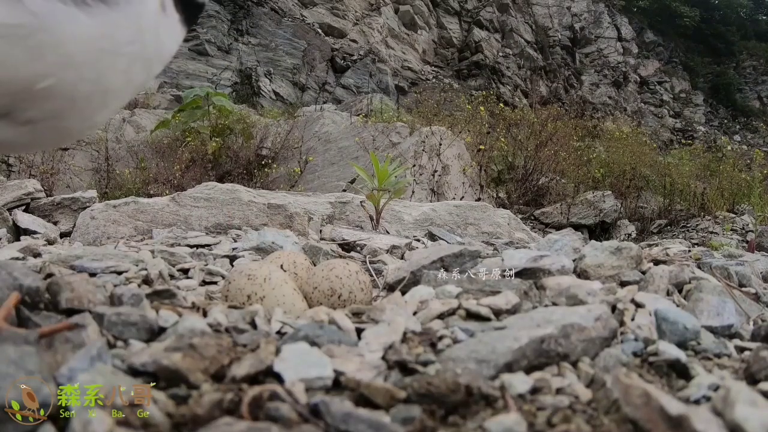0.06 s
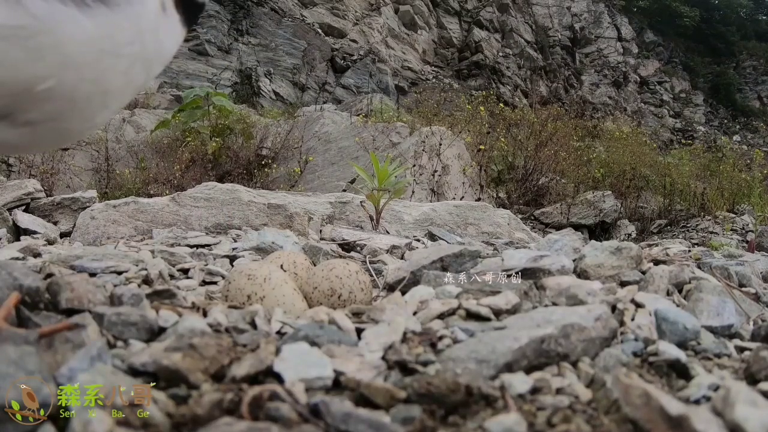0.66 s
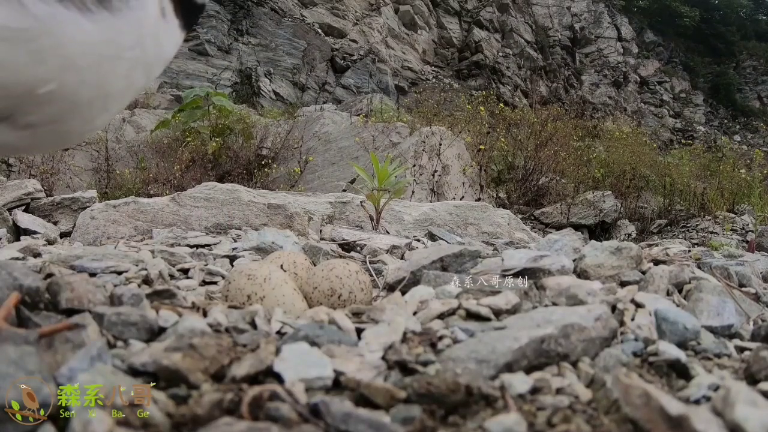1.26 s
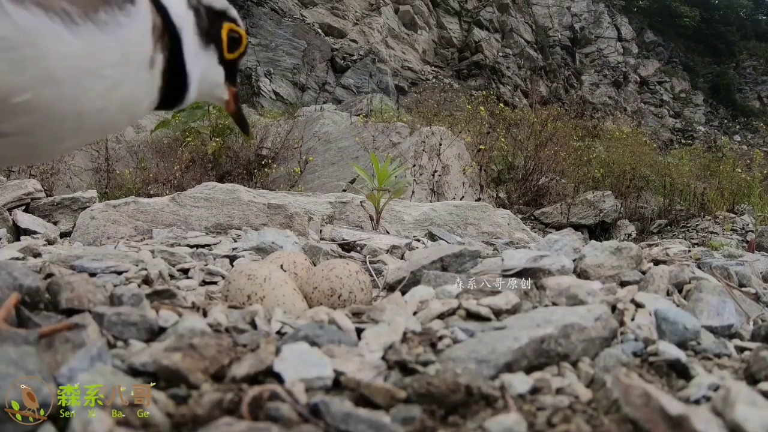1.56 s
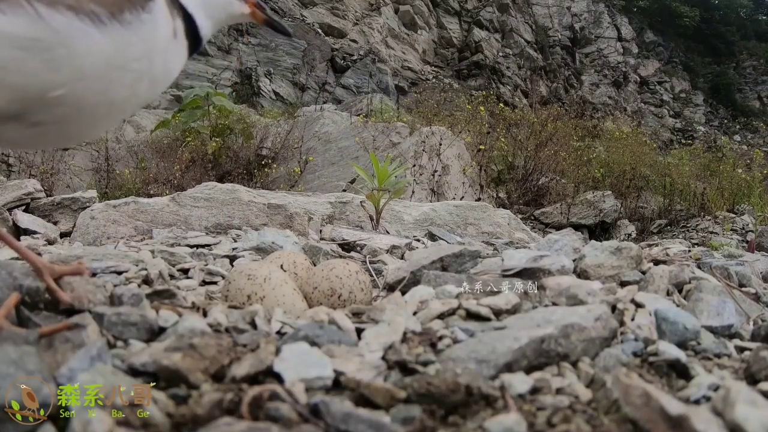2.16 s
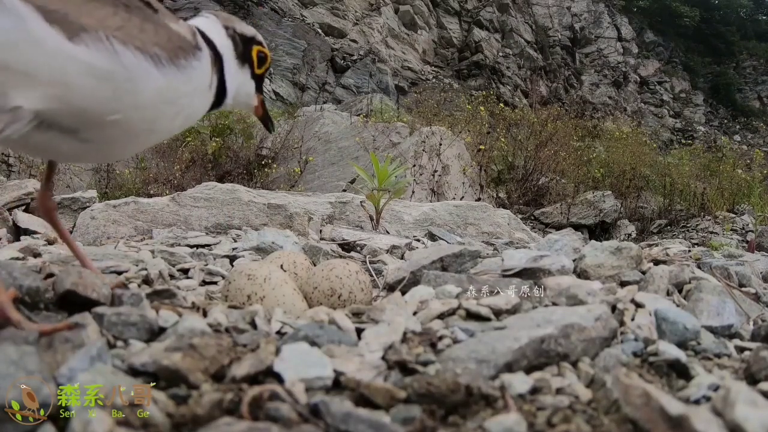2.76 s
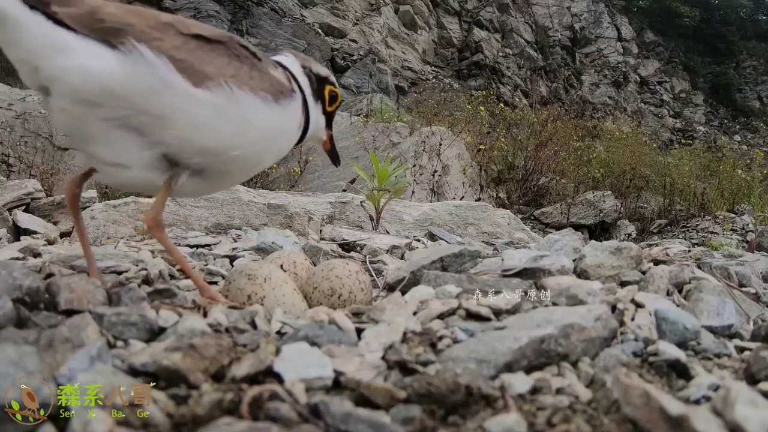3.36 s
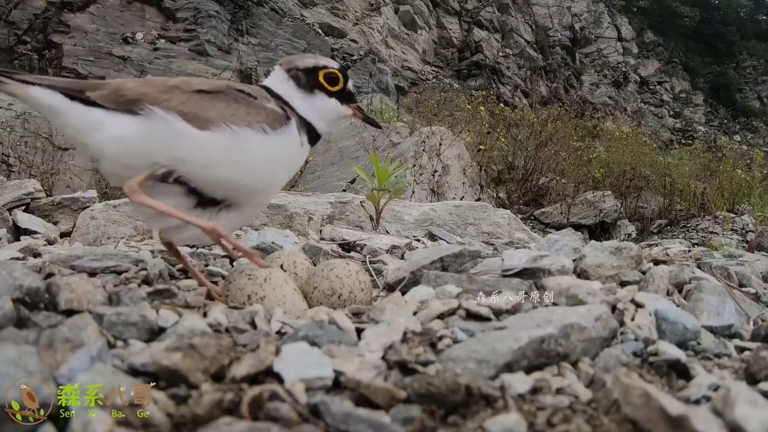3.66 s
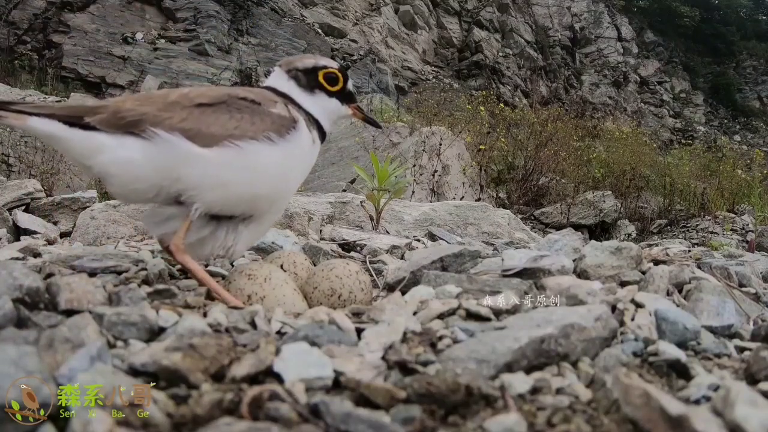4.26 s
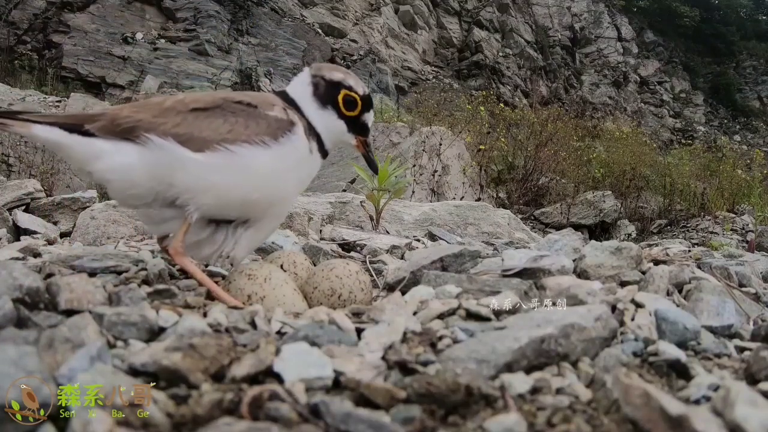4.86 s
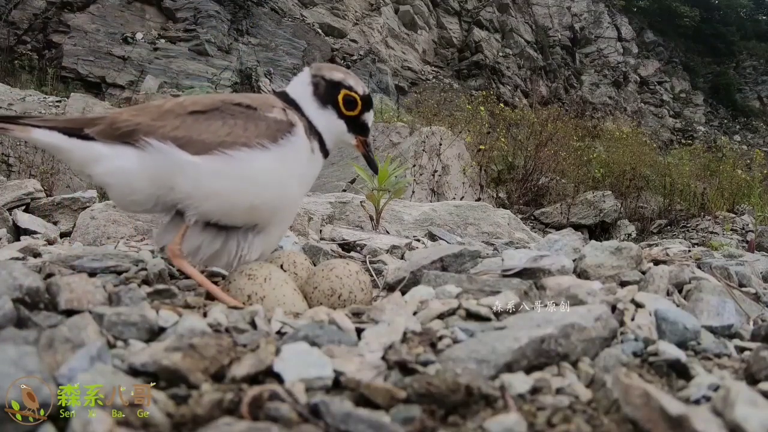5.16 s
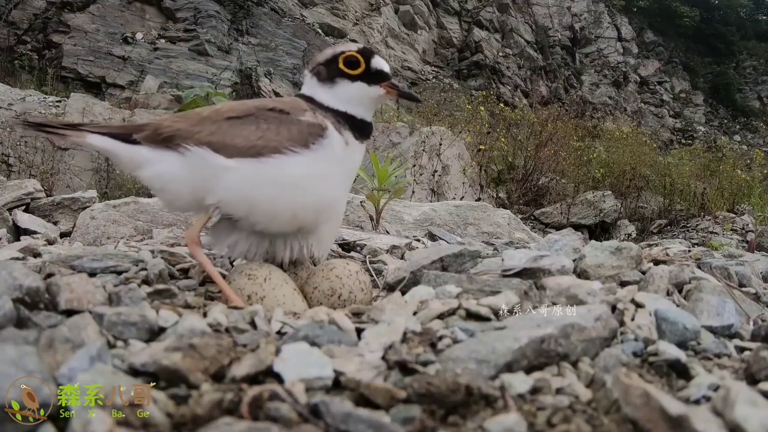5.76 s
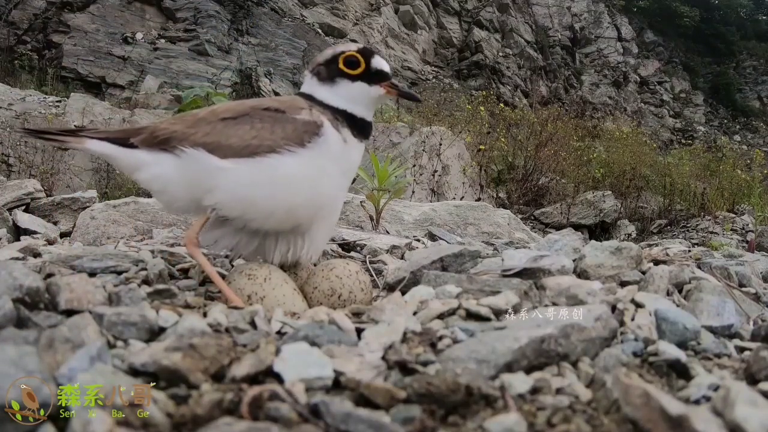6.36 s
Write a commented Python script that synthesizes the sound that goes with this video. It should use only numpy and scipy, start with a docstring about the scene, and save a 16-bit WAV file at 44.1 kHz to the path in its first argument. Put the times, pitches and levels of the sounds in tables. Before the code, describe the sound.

In a rocky river gorge, a steady close trickle bubbles, drips and spatters over stones throughout. A faint river wash and a distant low hum sit underneath, with a few soft bumps. In the second half a small shore bird, some way from the microphone, whistles a quick run of short, slightly hoarse notes mixed with two high peeps, and calls once more, faintly.

```python
"""In a river gorge, water trickles over stones close by: bubbles ring, droplets tick, fine spray fizzes.
Each plink is a pinched-off air pocket ringing with a gliding pitch; each tick is a drop hitting stone.
Further off, a shore bird whistles a few times, its notes smeared by the rock faces, with two thin peeps.
The bed is the even rush of the river, a low, far drone with a beating hum, and soft rumble and bumps."""
import sys
import numpy as np
from scipy import signal
from scipy.fft import rfft, irfft, next_fast_len
from scipy.io import wavfile
from scipy.ndimage import uniform_filter1d

SR = 44100
rng = np.random.default_rng(int(sys.argv[2]) if len(sys.argv) > 2 else 0)


def to_wav(s):
    """Save 16-bit WAV."""
    ch = np.atleast_2d(s).T  # columns
    pcm = np.round(np.clip(ch, -1, 1) * 32767)  # PCM
    wavfile.write(sys.argv[1], SR, pcm.astype(np.int16))


N = 291501
TIME = np.arange(N) / SR

# Levels in the cue tables are relative: each layer adds its own trim.
# hero bubbles: t/s, f/Hz, level/dB, ring time/(usual for that size), glide/(octaves per s)
HERO_BUBBLES = [(.0028, 1067, -41, 1.1, -10), (0.024, 1440, -48.5, 1.6, -6), (0.0656, 2980, -33, 0.18, -24),
                (0.0805, 1278, -32.5, 0.54, 0), (.114, 3290, -41.5, 1.1, -10),
                (.1168, 732, -48.5, 1.1, 1.5), (.145, 3450, -39, 0.9, -23), (0.2447, 4400, -36, 0.57, -27),
                (0.2509, 1386, -34, 0.69, -3), (0.271, 1740, -37.5, 0.75, 5),
                (0.296, 2730, -42.5, 0.73, -6), (0.3496, 3970, -36.5, 1.6, -38), (0.3832, 3260, -49, 2, -3),
                (0.539, 2820, -34.5, 0.49, -28), (.545, 1066, -54.5, 1, 6), (0.598, 2500, -43.5, 0.95, 11),
                (.64, 660, -55.5, 1.1, 3.5), (0.6707, 3800, -36, 0.72, -10),
                (0.7537, 1015, -31, 0.63, 15.5), (0.7741, 1188, -37.5, 1.1, 9.5),
                (.7752, 4330, -39, 1, -13), (0.793, 1560, -28.5, 0.2, -7), (.7947, 2540, -33, 0.38, -34),
                (.8015, 4240, -38.5, .9, -12), (.8724, 2900, -48, 1.2, -12), (.916, 2100, -44, 1.3, 8.5),
                (.955, 1500, -55, 1.2, -7), (1.0829, 1427, -28, 0.55, -5), (1.1021, 4570, -37, 0.67, -30),
                (1.131, 1292, -36.5, 0.95, -2), (1.1557, 1890, -38, 0.88, 31),
                (1.1743, 2920, -29.5, 0.19, -30), (1.199, 1577, -35, 0.67, 5),
                (1.2414, 4900, -43, 2.1, -35), (1.245, 638, -58, 0.97, -3.5), (1.397, 1755, -40, 0.79, -17),
                (1.4022, 2330, -32.5, 0.34, -22), (1.4394, 3980, -42.5, 1.3, -9),
                (1.4473, 1855, -40, 1.1, 8), (1.463, 2800, -36, 0.44, 3), (1.522, 1231, -41.5, 1.36, -7),
                (1.5831, 3430, -33.5, 0.49, -36), (1.583, 1280, -38, 1.2, -0.5),
                (1.5835, 1690, -46, .9, -2), (1.609, 1416, -28, 0.71, 13), (1.6228, 1880, -33, 0.9, -14),
                (1.6633, 3600, -31, 0.6, -20), (1.7012, 2430, -40, 0.47, -12), (1.716, 2390, -45, 1.5, 13),
                (1.721, 900, -48.5, 1.9, 16.5), (1.7642, 3800, -34.5, 0.44, -11),
                (1.7817, 1270, -34, 0.77, 0), (1.7994, 1655, -49, 1.3, 8), (1.8563, 1075, -38, .4, 12),
                (1.859, 1208, -23.5, 0.55, 6.5), (1.866, 3800, -36.5, 1, -13),
                (1.869, 1220, -30.5, 0.51, 29), (1.8767, 1430, -27, 0.53, 37), (1.8795, 2320, -41, 0.8, 13),
                (1.91, 3770, -34, 0.82, -14), (1.935, 681, -48.5, 0.92, 0.5),
                (1.9485, 4070, -36.5, 0.64, -30), (1.9807, 2180, -41, 0.61, -9),
                (1.989, 1480, -36.5, 0.86, 3), (2.0123, 1630, -27.5, 0.75, 22),
                (2.0632, 3310, -27.5, 0.56, -60), (2.155, 1490, -34.5, 1.4, 2.5),
                (2.1972, 1212, -43, 1.2, 2.5), (2.297, 1140, -48.5, 1.35, 7.5), (2.296, 2100, -47, 3.9, 4),
                (2.343, 1745, -29, 0.55, 45), (2.3432, 1334, -34, .6, -5.5), (2.354, 3140, -39, 1.2, -15),
                (2.384, 1264, -44, 0.83, -2), (2.4142, 1810, -37, 0.56, 13), (2.583, 2110, -35, 0.5, -11),
                (2.6267, 1960, -32.5, 0.69, -10), (2.6462, 1840, -45, 3.4, -12.5),
                (2.7432, 1970, -36.5, 0.52, -33), (2.752, 1550, -31.5, 1.4, 7.5),
                (2.8193, 738, -46.5, 1, -2.5), (2.8302, 1830, -37, 0.63, -3), (2.842, 1008, -44, 2, 8),
                (2.968, 1042, -48, 1, 7), (2.9927, 2950, -39, 0.85, -7), (3.074, 1383, -37, 1.8, 13),
                (3.0854, 3300, -32, 0.36, -35), (3.116, 1580, -29, 0.33, 1),
                (3.2135, 2300, -37.5, 0.39, -33), (3.239, 2630, -42.5, 0.76, -29),
                (3.3435, 1430, -43, 0.86, 5), (3.3478, 643, -45, 1.6, 2), (3.365, 3680, -35, 1.2, -11),
                (3.403, 1440, -44, 0.75, 0), (3.405, 2340, -46, 1.2, -6), (3.42, 2250, -39, 1.05, -12),
                (3.4508, 5870, -32.5, 0.45, -30), (3.452, 3270, -36.5, 1.4, -29),
                (3.4582, 1151, -32, 1.18, 4), (3.4904, 2520, -49, 0.74, -24),
                (3.5087, 3550, -39.5, 0.82, -16), (3.546, 2110, -43.5, 1.2, 4),
                (3.6396, 3230, -45, 0.93, -8), (3.549, 1196, -42.5, 0.74, 3),
                (3.6006, 1013, -46.5, 2.5, -4.5), (3.666, 1784, -42, 1, 21), (3.6992, 2077, -26, 0.56, 10),
                (3.752, 1000, -41.5, 0.49, 29), (3.782, 2740, -36.5, 0.54, -20),
                (3.786, 1267, -37.5, 0.6, 32), (3.8618, 1080, -41.5, 1.16, 4.5),
                (3.9255, 4140, -41, 2.5, 13), (3.936, 1410, -28, 0.62, 22), (4.0517, 813, -48.5, 1.7, 6.5),
                (4.076, 2420, -42.5, 0.85, 9), (4.1403, 1380, -51.5, 2, 9), (4.2263, 4040, -37.5, 1.3, -31),
                (4.268, 2730, -29.5, 0.3, -20), (4.2752, 1804, -38.5, 1.8, -7),
                (4.3214, 1242, -47, 1.1, -2.5), (4.334, 1700, -33.5, 0.92, -4),
                (4.3528, 1270, -42, 1.9, 2.5), (4.3865, 7360, -37, 1.8, -16), (4.405, 1624, -37, 0.59, 3),
                (4.494, 7000, -32, 1.9, -23), (4.5707, 1675, -40.5, 1.7, -6.5), (4.617, 1800, -43, 1.2, 2),
                (4.7117, 3570, -36.5, 1.2, -23), (4.9786, 3550, -31, 0.56, -34),
                (4.9837, 1820, -42, 0.91, -8), (5.0685, 3820, -35, 0.96, -29),
                (5.0732, 1567, -30.5, 1.5, -2.5), (5.12, 1695, -42.5, 1.4, 12),
                (5.1351, 1240, -39, 1.54, 1.5), (5.238, 3710, -37.5, 1.15, -7),
                (5.333, 1624, -29.5, 0.71, 6), (5.364, 1340, -45, 1.1, -3), (5.388, 3330, -42, .9, -15),
                (5.401, 1896, -37, 1, -9), (5.549, 1210, -48, .8, -11), (5.5625, 1330, -34, 1.17, 15),
                (5.576, 2150, -51, .9, -5), (5.588, 1290, -37.5, 0.97, 2.5), (5.592, 906, -47, 0.71, 9.5),
                (5.6222, 1250, -43.5, 1.5, -2), (5.7151, 1815, -31, 0.77, -15.5),
                (5.7362, 3350, -44, .9, -15), (5.776, 2320, -34, 0.5, 10), (5.8568, 1503, -41.5, 1.4, 3),
                (5.871, 858, -49, 1.1, 15.5), (5.921, 2190, -46, 1.1, -15), (5.935, 1158, -29.5, 0.55, 9.5),
                (5.9427, 1300, -58, 0.47, 4), (5.944, 1930, -41.5, 1, 4), (6.0683, 1620, -36.5, 0.51, -9),
                (6.1115, 3480, -29, 0.44, -53), (6.138, 1360, -40.5, 0.55, 15),
                (6.1632, 1416, -29.5, 0.59, 25.5), (6.185, 1700, -46, .9, 6), (6.1984, 1390, -48, .9, 7),
                (6.2222, 3970, -33, 0.4, -39), (6.264, 3330, -33.5, 1.1, -18),
                (6.2902, 908, -40.5, 0.53, 4.5), (6.301, 954, -48.5, 1.3, 14.5),
                (6.346, 1594, -33.5, 0.71, -21), (6.4026, 2030, -30.5, 0.33, -31),
                (6.429, 2900, -41, .8, -4), (6.468, 1090, -40.5, 0.56, 16), (6.572, 2900, -37.5, .8, -16),
                (6.6042, 2820, -30, 0.51, -47)]
# the sharpest droplets on stone: t/s, level/dB, colour centre f/Hz, left minus right/dB
HERO_DROPLETS = [(0.051, -25, 7300, 1), (0.0746, -23, 10300, 0), (.0807, -34, 8000, 0),
                 (0.12, -25, 9050, 0), (0.146, -22.5, 10300, 3), (.1989, -38, 10800, .5),
                 (0.2172, -22, 9100, 0), (0.2286, -32, 6070, 3), (0.245, -21, 9200, 1),
                 (0.2667, -24, 7900, 1), (0.329, -19, 10300, 2), (.343, -28.5, 12500, 2),
                 (.351, -28, 8000, 0), (0.3767, -20, 7500, -2), (0.3895, -17, 13700, -2),
                 (0.4054, -26, 10600, 3), (.5029, -19, 12400, 2), (.5743, -23.5, 9200, 0),
                 (0.6216, -36, 5500, 2), (0.6444, -24, 6100, 1), (.6596, -30, 9000, -4),
                 (0.737, -16, 8500, 0.5), (0.775, -22, 6100, -2), (.893, -28, 13000, 2.5),
                 (0.9127, -26, 6930, 8), (.965, -19, 9500, 1), (0.9826, -30, 6200, -3),
                 (1.014, -27, 11400, -1.5), (1.035, -28, 8050, -3), (1.0643, -19.5, 8100, 3),
                 (1.1167, -25, 9900, 5), (1.1994, -28, 7000, -2), (1.2415, -32, 6500, -3),
                 (1.326, -28, 9500, -2), (1.563, -21, 11800, -2), (1.6, -33, 9000, 2),
                 (1.78, -21.5, 10200, -1), (1.8392, -20, 10200, -3), (1.879, -29, 7000, 0),
                 (1.936, -27, 6400, -3), (2.012, -29.5, 4240, 1), (2.0614, -15.5, 10300, 1),
                 (2.1722, -28.5, 8800, -3), (2.246, -20.5, 7340, -1), (2.2703, -23, 12100, 2),
                 (2.3103, -25, 5960, 1), (2.343, -34, 4900, 5), (2.3709, -25.5, 7160, 11),
                 (2.3834, -26, 6560, 0), (2.413, -27, 6800, -1), (2.48, -17.5, 7500, 2),
                 (2.486, -28, 7850, -7), (2.5372, -21.5, 12000, -2), (2.652, -25.5, 9800, 2.5),
                 (2.678, -25, 12600, 4), (3.018, -29.5, 7400, 7), (3.107, -29, 5600, 5),
                 (3.1424, -30, 7990, -3), (3.202, -24.5, 10100, 1), (3.2525, -25, 10600, 3),
                 (3.2916, -21, 6600, -1), (3.363, -28, 5600, 0), (3.45, -19, 6260, -2),
                 (3.5012, -15.5, 9150, -1), (3.588, -18, 11000, 1), (3.6685, -22.5, 9900, -1),
                 (3.6999, -29.5, 3970, -1), (3.922, -20.5, 7200, 0), (4.093, -23, 8900, -1),
                 (4.1305, -17.5, 6560, -2), (4.1586, -26, 7090, -2), (4.171, -26, 9800, -3),
                 (4.2276, -26, 6440, -1), (4.2818, -31, 6350, 0), (4.302, -24, 6600, 0),
                 (4.373, -27, 9100, 1), (4.3867, -30, 7250, 7), (4.4945, -28.5, 6860, 12),
                 (4.5335, -25, 12000, 1), (4.6529, -27, 11900, -3), (4.715, -28, 7000, -2),
                 (4.7344, -16.5, 9800, -2), (5.0105, -20, 6500, 2), (5.114, -27, 7160, 4),
                 (5.166, -20.5, 6700, 3), (5.1907, -31, 5630, 3), (5.333, -22.5, 7040, 7),
                 (5.3643, -28, 5130, 0), (5.398, -18.5, 12100, -3), (5.426, -22, 10000, -2),
                 (5.438, -17.5, 12500, -2), (5.461, -22.5, 9400, 0), (5.519, -34, 5540, 3),
                 (5.6207, -27, 11100, 0), (5.632, -24.5, 10700, -2), (5.8245, -25.5, 9500, -4),
                 (5.9174, -25, 9860, -2), (6.011, -26.5, 6300, 2), (6.029, -30, 5200, -2),
                 (6.1157, -23, 12000, -1), (6.1387, -22, 7400, 0), (6.1821, -28.5, 4750, 2),
                 (6.2222, -39, 6500, 0), (6.29, -20.5, 8340, 0), (6.4074, -26, 12500, 2),
                 (6.414, -21, 12400, 0), (6.478, -23, 7650, 0), (6.518, -27, 10200, 2),
                 (6.585, -20, 10900, -2), (6.6045, -24.5, 6800, 3)]
# splashes that throw a shower of spray: t/s, length/s, level/dB
SPLASH_CUES = [(0.006, 0.065, -45), (0.213, 0.025, -65), (0.3, 0.041, -47), (0.355, 0.072, -44),
               (0.502, 0.059, -40), (1.081, 0.046, -41), (1.18, 0.083, -45), (1.554, 0.043, -44),
               (1.859, 0.023, -42), (1.892, 0.021, -40), (1.923, 0.024, -39), (2.049, 0.026, -39),
               (2.25, 0.022, -53), (2.32, 0.092, -43), (2.476, 0.031, -42.5), (3.195, 0.035, -37.5),
               (3.273, 0.03, -49), (3.339, 0.057, -46.5), (3.496, 0.031, -51), (3.668, 0.028, -52),
               (3.921, 0.036, -33), (4.162, 0.023, -41.5), (4.256, 0.029, -35.5), (4.308, 0.056, -40),
               (4.363, 0.056, -36), (4.71, 0.041, -38), (5.114, 0.067, -46.5), (5.408, 0.05, -37),
               (5.626, 0.03, -56), (6.01, 0.058, -45), (6.4, 0.014, -34.5)]
# the trickle's surges: t/s, spray level/dB, gurgle level/dB
SURGES = [(0.0, -60, -56.5), (0.37, -62.5, -64), (0.51, -65.5, -65), (0.92, -56, -60), (1.25, -72, -61.5),
          (1.4, -57, -56), (1.76, -59, -56), (2.43, -56.5, -55.5), (2.89, -60, -59), (3.53, -55.5, -58),
          (3.88, -58.5, -60.5), (4.37, -59, -59), (4.49, -58.5, -55), (4.63, -56, -50.5), (4.91, -61, -59),
          (5.06, -57, -54.5), (5.48, -57.5, -54), (6.6, -58, -56)]
# bird whistles: t/s, length/s, crest f/Hz, level/dB, climb/(share of crest), hoarseness/(share of pitch)
WHISTLE_NOTES = [(3.99, 0.069, 2210, -52.5, 0.046, 0.022), (4.24, 0.14, 2690, -48, 0.038, 0.12),
                 (4.55, 0.18, 2870, -45, .26, 0.11), (4.9, 0.29, 2270, -50.5, .18, 0.108),
                 (5.93, 0.27, 2630, -60, 0.061, 0.12)]
# thin high peeps: t/s, length/s, crest f/Hz, level/dB, climb/(share of crest), hoarseness/(share of pitch)
PEEP_NOTES = [(4.67, .08, 5650, -64, .08, .035), (4.84, .1, 5950, -62.5, .14, .028)]
# fader rides for the far drone, the hum inside it and the rumble below: t/s, level/dB
DRONE_RIDE = [(0.0, -63), (0.07, -65), (0.62, -62), (1.4, -71), (1.65, -63.5), (2.02, -61.5), (2.06, -60.5),
              (2.59, -56.5), (2.81, -52.5), (3.01, -55), (4.37, -63), (4.85, -56.5), (4.96, -61),
              (6.6, -59)]
HUM_RIDE = [(0, -79.5), (1.5, -76), (1.88, -62), (2.0, -51.5), (2.25, -58.5), (2.45, -56), (2.58, -59.5),
            (2.82, -49.5), (2.97, -58), (3.13, -50.5), (3.3, -73), (3.7, -66), (4.3, -72), (5.0, -65.5),
            (6.61, -64)]
RUMBLE_RIDE = [(0.0, -76), (0.33, -69.5), (0.44, -84), (1.68, -74), (2.5, -73), (2.85, -66), (3.4, -75),
               (4.4, -76), (6.6, -74.5)]
# soft low bumps: t/s, length/s, f/Hz, level/dB
BUMP_CUES = [(1.741, 0.12, 90, -65.5), (2.538, 0.16, 79, -61.5), (2.762, 0.064, 75.6, -52),
             (3.14, 0.15, 72, -61), (4.532, .1, 84.6, -61.5), (4.66, 0.24, 122, -55.5),
             (5.828, 0.06, 62, -69)]
# EQ for the spray, the glassy edge of all ticks, the river, the drone and the rumble: f/Hz, gain/dB
SPRAY_EQ = [(500, -42), (1500, 5.5), (3000, 0), (4200, 0), (8000, 2), (10200, 4.5), (12500, 6), (15500, 1)]
GLASSY_EQ = [(4000, 3.5), (5900, -3.5), (7150, -2), (8500, -6), (10000, -4)]
RIVER_EQ = [(100, -6), (300, -10), (470, -4.5), (660, 1), (1000, 1), (1650, 1.5), (2400, -6), (4000, -10),
            (8000, -12.5), (15000, -11)]
DRONE_EQ = [(70, -41), (120, -17.5), (152, 0.5), (175, -1), (198, -1), (222, -6), (265, -12.5), (340, -16),
            (430, -25.5), (700, -44.5)]
RUMBLE_EQ = [(15, -32), (30, -12), (60, 2), (90, -2.5), (130, 1.5), (220, -45)]

BUBBLE_HZ = 1344  # pitch of a bubble of the usual size
GRAIN = 512  # samples that hold one droplet


def bubble(hz, t60, glide, lag):
    """An air pocket pinches off and rings; glide is in octaves per s, lag in samples between the ears."""
    swell_cycles, sharp_share, settle_s = .55, .22, .0008
    t60 = np.clip(t60, .002, .15)
    t = np.maximum(np.arange(int(t60 * SR)) + np.array([[lag], [-lag]]) / 2, 0) / SR
    swell = 1 - np.exp(-t * hz / swell_cycles)
    settling = sharp_share * settle_s * (1 - np.exp(-t / settle_s))  # a new bubble starts sharp
    cycles = hz * (t * 2 ** (glide * t / 2) + settling)
    return swell * np.sin(2 * np.pi * cycles) * np.exp(-np.log(1000) * t / t60)


def ring_for_size(hz):
    """Ring time and glide: big bubbles ring long and rise, small ones die fast and sag."""
    octaves = np.log2(hz / BUBBLE_HZ)
    t60 = .062 * 2 ** (-1.2 * octaves)
    glide = 1.5 - 15.9 * max(octaves, -.3)
    return t60, glide


def hero_plinks(gain_db, shimmer_db, lag):
    """Up-front bubbles of the nearest little fall; the moving surface makes their rings shimmer."""
    out = np.zeros((2, N))
    for s, hz, db, stretch, glide in HERO_BUBBLES:
        side, skew = rng.standard_normal(2)
        t60, _ = ring_for_size(hz)
        add(out, s, undb(db + gain_db) * bubble(hz, stretch * t60, glide, lag * skew), pan_db=.5 + side)
    return out * undb(shimmer_db * wander(150))


def loose_plink(hz, rise, place, lag):
    """A bubble that rings as its size suggests; rise and place (0 to 1) vary its glide and direction."""
    t60, glide = ring_for_size(hz)
    return bubble(hz, t60, glide + 14 * (rise - .5), lag * (2 * place - 1))


def daughter_bubbles(gain_db, spread_s, spread_oct, lag, count):
    """Each hero bubble sheds a few weaker ones, mostly smaller, just after it."""
    out = np.zeros((2, N))
    for s, hz, db, *_ in HERO_BUBBLES:
        for late, pitch, place, rise in rng.random((count, 4)):
            ring = loose_plink(hz * 2 ** (spread_oct * (pitch - .3)), rise, place, lag)
            add(out, s + spread_s * (.15 + late), undb(db + gain_db) * ring, pan_db=4 * (place - .5))
    return out


def soft_plinks(band_hz, gain_db, spread_db, lag, count):
    """Softer bubbles of the same fall, loosely spaced as fill."""
    out = np.zeros((2, N))
    for k, (when, pitch, size, place, rise) in enumerate(rng.random((count, 5))):
        ring = undb(gain_db + spread_db * size) * loose_plink(pitch_in(band_hz, pitch), rise, place, lag)
        add(out, (k + when) / count * N / SR, ring, pan_db=5 * (place - .5))
    return out


def bubble_crowd(band_hz, cycles, spread_db, lag, count):
    """A texture of lesser bubbles at rms 1; each rings for about `cycles`, so small ones die sooner."""
    out = np.zeros((2, N))
    for when, pitch, size, life, rise, place in rng.random((count, 6)):
        hz = pitch_in(band_hz, pitch)
        t60 = cycles * (.5 + life) / hz
        glide = (rise - .3) * 1.65 / t60
        ring = bubble(hz, t60, glide, lag * (2 * place - 1))
        add(out, when * N / SR, undb(spread_db * size ** 2) * ring, pan_db=4 * (place - .5))
    return unit(out)


def sizzle(band_hz, gain_db, spread_db, within_s, cycles, lag, count):
    """Each hero droplet drags in a few tiny bubbles that ping in the moment after it."""
    out = np.zeros((2, N))
    for s, db, _, pan_db in HERO_DROPLETS:
        for late, pitch, size, place in rng.random((count, 4)):
            hz = pitch_in(band_hz, pitch)
            t60 = cycles / hz
            ping = bubble(hz, t60, -.2 / t60, lag * (2 * place - 1))
            add(out, s + within_s * late ** 2, undb(db + gain_db + spread_db * size) * ping, pan_db)
    return out


def droplet(hz, width_oct, lag, hiss=.15, hiss_s=.0013):
    """One impact: a snap in the middle of the grain and a short tail of hiss, coloured around hz."""
    n = np.arange(GRAIN) - GRAIN // 2
    snap = np.sinc(n + np.array([[lag], [-lag]]) / 2)
    common, *ears = rng.standard_normal((3, GRAIN))
    tail = (n >= 0) * np.exp(-np.abs(n) / (SR * hiss_s)) * (.36 * common + np.array(ears))
    octaves = np.log2(bin_hz(GRAIN) / hz)
    octaves = np.minimum(octaves, octaves / 1.9)  # a wider skirt above the centre keeps it bright
    return unit(irfft(rfft(snap + hiss * tail) / (1 + (octaves / width_oct) ** 2)))


def hero_ticks(gain_db, width_oct, lag):
    """The sharpest droplets strike stone, each with its own colour and pan."""
    out = np.zeros((2, N))
    for s, db, hz, pan_db in HERO_DROPLETS:
        tick = droplet(hz, width_oct, lag * rng.normal(-.99, .43))
        add(out, s - GRAIN / 2 / SR, undb(db + gain_db) * tick, pan_db)
    return out


def surface_pops(centre_hz, gain_db, db_per_oct, width_oct, lag):
    """Each hero bubble breaks the surface with a tick; small ones pop harder for their size."""
    out = np.zeros((2, N))
    for s, hz, db, *_ in HERO_BUBBLES:
        pop = droplet(centre_hz * 2 ** rng.normal(0, .33), width_oct, lag * rng.normal(-1.25, 1))
        tilt_db = db_per_oct * np.log2(hz / BUBBLE_HZ)
        add(out, s - GRAIN / 2 / SR, undb(db + gain_db + tilt_db) * pop)
    return out


def soft_ticks(band_hz, gain_db, spread_db, width_oct, lag, count):
    """Softer droplets from all over the stones, loosely spaced as fill."""
    out = np.zeros((2, N))
    for k, (when, pitch, size, place) in enumerate(rng.random((count, 4))):
        tick = droplet(pitch_in(band_hz, pitch), width_oct, lag * (2 * place - 1.5))
        s = (k + when) / count * N / SR
        add(out, s, undb(gain_db + spread_db * size) * tick, pan_db=10 * (place - .5))
    return out


def spray(band_hz, spread_db, width_oct, lag, count):
    """A fizz of fine droplets at rms 1, mostly faint, a few strong."""
    out = np.zeros((2, N))
    for when, strength, place, wet, pitch in rng.random((count, 5)):
        hz = pitch_in(band_hz, pitch)
        tick = droplet(hz, width_oct, lag * (2 * place - 1.5), hiss=.34 * wet, hiss_s=.013)
        add(out, when * N / SR, undb(spread_db * strength ** 3) * tick, pan_db=8 * (place - .5))
    return unit(eq(out, SPRAY_EQ))


def spray_envelope(flow_db, splash_db, spatter_db, spatter_s):
    """The flow throws spray all the time; each splash adds a shower, each hero bubble a spatter."""
    power = undb(flow_db)[None] ** 2
    for s, length, db in SPLASH_CUES:
        add(power, s, undb(db + splash_db) ** 2 * np.hanning(int(SR * length)))
    for s, _, db, *_ in HERO_BUBBLES:
        add(power, s - spatter_s / 4, undb(db + spatter_db) ** 2 * np.hanning(int(SR * spatter_s)))
    return np.sqrt(power[0])


def trickle():
    """The water bus: ringing bubbles with a short reflection off the stones, dry ticks and spray on top."""
    spray_db, gurgle_db = rides(SURGES)
    shower = spray_envelope(spray_db + 2.5, splash_db=-4.5, spatter_db=-17.5, spatter_s=.0083)
    sputter = undb(3 * wander(60))  # the spray comes in little spits
    plinks = hero_plinks(gain_db=3.5, shimmer_db=.9, lag=.22)
    plinks += daughter_bubbles(gain_db=-17, spread_s=.024, spread_oct=.87, lag=4.4, count=3)
    plinks += soft_plinks((1445, 3820), gain_db=-45.5, spread_db=3.5, lag=2.5, count=32)
    tinkle = bubble_crowd((2464, 4853), cycles=130, spread_db=13, lag=4.1, count=700)
    sparkle = bubble_crowd((4530, 11740), cycles=56, spread_db=3.5, lag=3.43, count=800)
    gurgle = bubble_crowd((1275, 2500), cycles=65, spread_db=15, lag=5.3, count=900)
    burble = bubble_crowd((607.6, 1188), cycles=57, spread_db=7, lag=1.1, count=110)
    plinks += undb(spray_db - 5.5) * tinkle + undb(-9) * shower * sparkle
    plinks += undb(gurgle_db - 2) * gurgle + undb(-70) * burble
    plinks += sizzle((4860, 15700), gain_db=-32.5, spread_db=12, within_s=.018,
                     cycles=44, lag=3.4, count=6)
    ticks = hero_ticks(gain_db=-19.5, width_oct=.27, lag=1.34)
    ticks += surface_pops(centre_hz=7200, gain_db=-24.5, db_per_oct=5, width_oct=.54, lag=1.34)
    ticks += soft_ticks((7000, 14100), gain_db=-48.5, spread_db=1, width_oct=.6, lag=1.33, count=90)
    ticks += shower * sputter * spray((2810, 14000), spread_db=9.5, width_oct=.57, lag=4.4, count=2400)
    water = rock_reverb(plinks, t60=.05, wet_db=-6) + eq(ticks, GLASSY_EQ)
    # so small a source close under the surface radiates no bass
    low_cut = signal.butter(3, 580, "high", fs=SR, output="sos")
    return signal.sosfilt(low_cut, water)


def bird(notes, quaver_hz):
    """Arched notes that climb, crest and drop; the hoarser a note, the more it buzzes and quavers."""
    crest, drop, buzz_hz = .42, .16, 530  # crest as a share of the length, drop of the pitch
    out = np.zeros((2, N))
    for s, length, top_hz, db, climb, hoarse in notes:
        u = np.linspace(0, 1, int(length * SR))
        arch = 1 - np.where(u < crest, climb * (1 - u / crest) ** 2,
                            drop * ((u - crest) / (1 - crest)) ** 2)
        quaver = np.interp(u * length * quaver_hz, np.arange(512), rng.standard_normal(512))
        buzz = np.sin(2 * np.pi * buzz_hz * u * length)
        hz = top_hz * arch * (1 + hoarse * (buzz + .65 * quaver))
        effort = 2 * np.sqrt(u * (1 - u)) * arch ** 2
        add(out, s, undb(db) * effort * sine(hz))
    return out


def rock_reverb(x, t60, wet_db):
    """The direct sound plus reflections from rough rock: a dense tail, different in each ear."""
    t = TIME[:SR // 2]
    tail = rng.standard_normal((2, len(t))) * np.exp(-np.log(1000) * t / t60)
    tail = tail + tail[::-1] / 4  # crossfeed
    tail /= np.sqrt(np.sum(tail ** 2) / 2)
    return x + undb(wet_db) * signal.fftconvolve(x, tail, axes=1)[:, :N]


def river():
    """The river's far rush: a wide, even wash whose level barely wavers."""
    return noise_bed(RIVER_EQ, side_db=-1) * undb(-58 + wander(6.5))


def far_drone(hum_hz, undertone_hz):
    """A hollow drone over a soft rumble; inside it a hum beats against a weaker tone below."""
    drone_db, rumble_db, hum_db = rides(DRONE_RIDE) + rides(RUMBLE_RIDE) + rides(HUM_RIDE)
    drone = noise_bed(DRONE_EQ, side_db=-9.5) * undb(drone_db + wander(6))
    rumble = noise_bed(RUMBLE_EQ, side_db=-20) * undb(rumble_db + .5 + 2 * wander(12))
    upper, lower = (sine(hz + 4.5 * wander(14)) for hz in (hum_hz, undertone_hz))
    hum = unit(upper + undb(-5.5) * lower) * undb(hum_db + 1.3 * wander(13))
    return drone + rumble + hum


def bumps(width_oct):
    """Dull swells of low noise, each in a band around its own pitch."""
    out = np.zeros((2, N))
    for s, length, hz, db in BUMP_CUES:
        swell = np.hanning(int(SR * length))
        octaves = np.log2(bin_hz(SR) / hz)
        low = irfft(rfft(rng.standard_normal(SR)) / (1 + (octaves / width_oct) ** 4))
        add(out, s, undb(db) * swell * unit(low[:len(swell)]))
    return out


def noise_bed(points, side_db):
    """EQ'd mid/side noise at rms 1; side_db sets the stereo width."""
    mid, side = rng.standard_normal((2, N))
    return unit(eq(mid + undb(side_db) * np.array([side, -side]), points))


def undb(db):
    """Decibels to gain."""
    return 10 ** (np.asarray(db) / 20)


def unit(x):
    """Scale to rms 1."""
    return x / np.sqrt(np.mean(x ** 2) + 1e-20)


def sine(hz):
    """An oscillator that follows a pitch curve."""
    return np.sin(2 * np.pi * np.cumsum(hz) / SR)


def pitch_in(band_hz, share):
    """The pitch that lies a share of the way up a band, in octaves."""
    low, high = band_hz
    return low * (high / low) ** share


def bin_hz(size):
    """FFT bin frequencies, held at 1 Hz or above."""
    return np.maximum(np.fft.rfftfreq(size, 1 / SR), 1)


def eq(x, points):
    """Filter through a curve of (f/Hz, gain/dB) points."""
    hz, db = np.transpose(points)
    size = next_fast_len(N)
    gain = undb(np.interp(np.log(bin_hz(size)), np.log(hz), db))
    return irfft(rfft(x, size) * gain, size)[..., :N]


def rides(table):
    """A list of fader curves, one for each level column, with a value per sample."""
    s, *columns = np.transpose(table)
    return [np.interp(TIME, s, column) for column in columns]


def wander(rate_hz):
    """Smooth random modulation at rms 1."""
    steps = rng.standard_normal(1024)
    return unit(uniform_filter1d(np.interp(TIME * rate_hz, np.arange(len(steps)), steps), size=200))


def add(out, s, sound, pan_db=0):
    """Mix a sound into out at time s; pan_db is left minus right."""
    i = int(np.clip(s * SR, 0, N - 1))
    sound = sound * undb(np.array([[pan_db], [-pan_db]]) / 2)
    out[:, i:i + sound.shape[1]] += sound[:len(out), :N - i]


def scene():
    """The mix: trickle up front, bird back in the gorge, river and low end underneath."""
    water = trickle()
    whistles = rock_reverb(bird(WHISTLE_NOTES, quaver_hz=550), t60=.07, wet_db=0)  # near stones
    whistles = rock_reverb(whistles, t60=.7, wet_db=-10)  # then the rock faces
    peeps = undb(-.5) * rock_reverb(bird(PEEP_NOTES, quaver_hz=400), t60=.18, wet_db=3)
    bed = river() + far_drone(hum_hz=193.4, undertone_hz=169.5) + bumps(width_oct=.47)
    return water + whistles + peeps + bed


def record(dry):
    """A steep high cut on the master takes off the very top."""
    top_hz = 15900
    return signal.sosfilt(signal.ellip(8, .2, 70, top_hz, fs=SR, output="sos"), dry)


dry = scene()
out = record(dry)
to_wav(out)
```